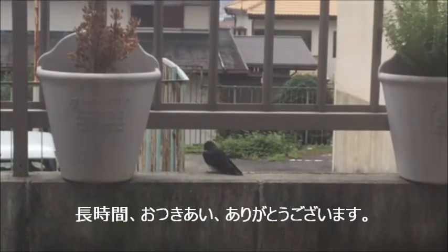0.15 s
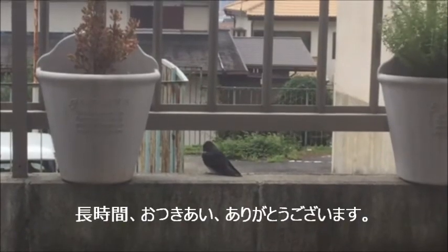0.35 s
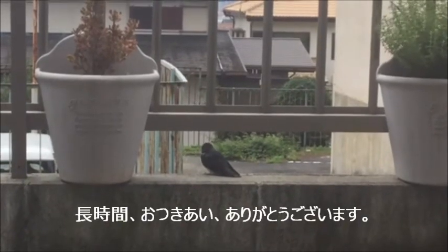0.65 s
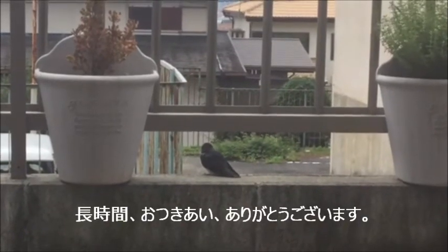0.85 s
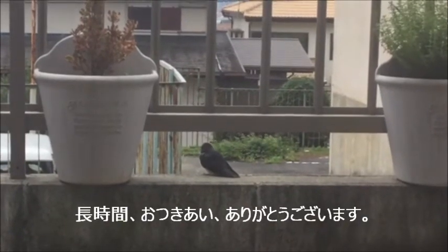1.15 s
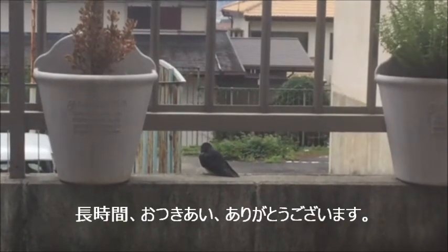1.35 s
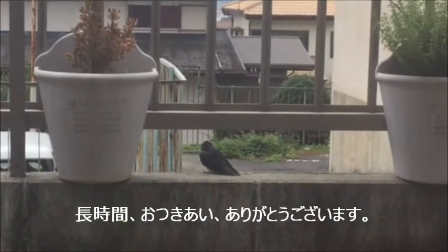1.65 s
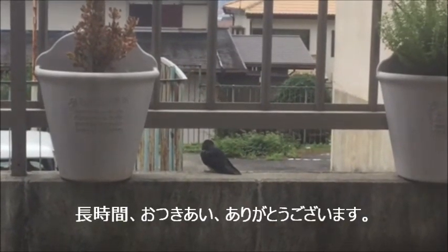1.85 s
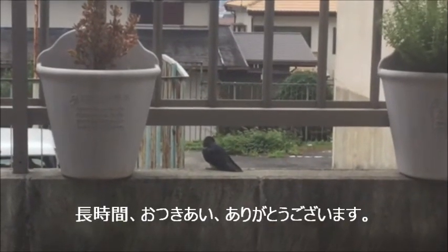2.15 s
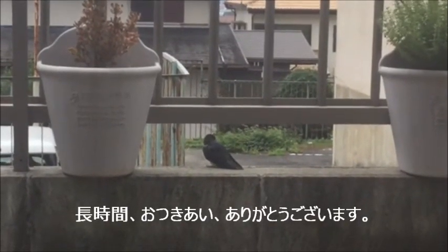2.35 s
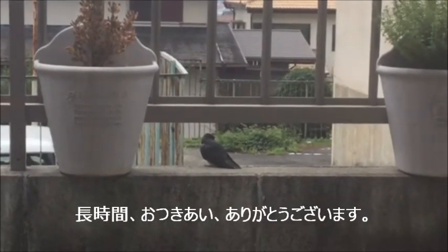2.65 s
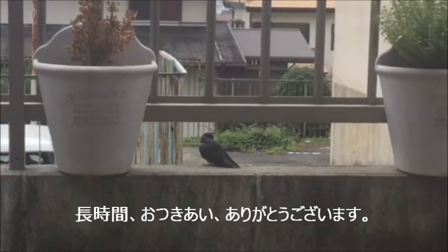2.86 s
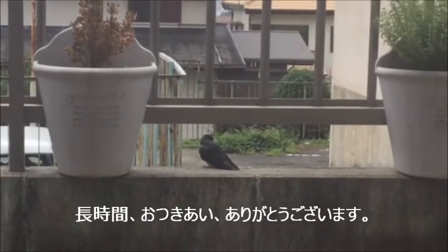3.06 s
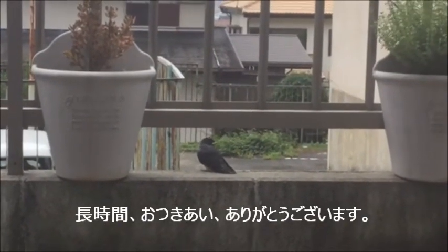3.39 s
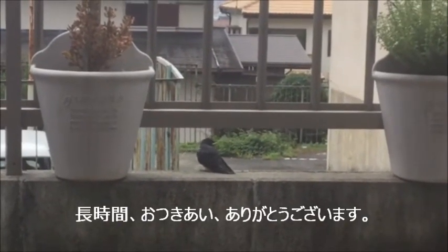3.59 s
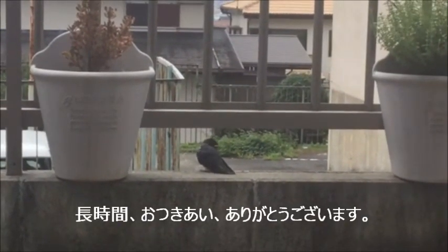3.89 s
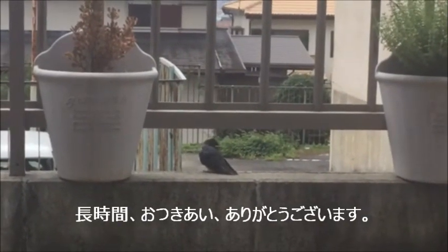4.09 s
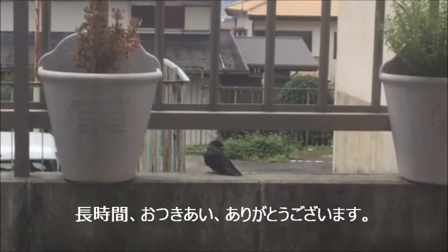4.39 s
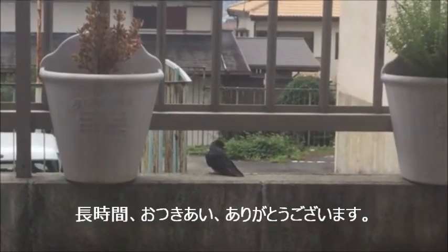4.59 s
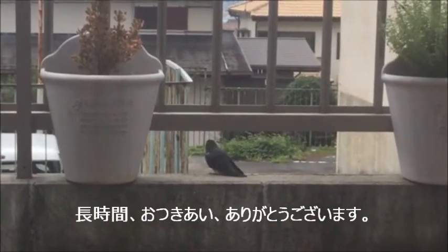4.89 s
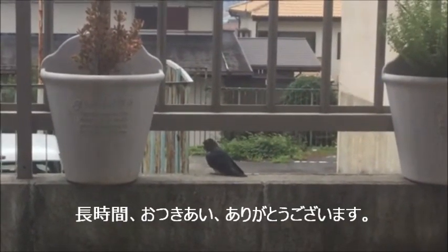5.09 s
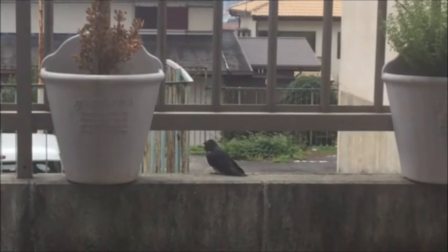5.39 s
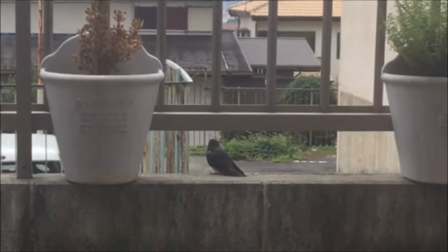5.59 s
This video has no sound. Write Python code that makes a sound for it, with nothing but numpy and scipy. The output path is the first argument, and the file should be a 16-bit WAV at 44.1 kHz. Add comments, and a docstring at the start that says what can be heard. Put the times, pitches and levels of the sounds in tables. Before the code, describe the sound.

Short, high, raspy chirps from a nearby young bird come at uneven gaps outdoors, over faint traffic rumble and an early low thump.

```python
"""Low town rumble and a wash of air come first, with a faint whine, a small bird's peep and soft bumps
on the camera. Then a swallow chick on a balcony ledge gives six sharp, raspy chirps, sung with both
sides of its syrinx at once; the balcony and the houses opposite answer. Between the chirps come
more peeps, a thin tick close by, a far crow's caws and two clacks from across the street."""
import sys
import numpy as np
from scipy import signal
from scipy.fft import rfft, irfft, next_fast_len
from scipy.io import wavfile
from scipy.ndimage import uniform_filter1d, map_coordinates

SR = 44100
rng = np.random.default_rng(int(sys.argv[2]) if len(sys.argv) > 2 else 0)


def store_pcm(level_fs):
    """Save levels as 16-bit WAV."""
    pcm = np.round(np.clip(level_fs, -1, 1) * 32767).astype(np.int16)
    wavfile.write(sys.argv[1], SR, np.atleast_2d(pcm).T)


N = 253134


def amp(db):
    """Decibels to gain."""
    return 10 ** (np.asarray(db) / 20)


def unit(x):
    """Scale to rms 1."""
    return x / np.sqrt(np.mean(x ** 2) + 1e-20)


def ramp(u):
    """A smooth fade-in as u goes from 0 to 1."""
    return np.sin(np.pi / 2 * np.clip(u, 0, 1)) ** 2


def wobble(rate, size):
    """A smooth random modulator, rate knots a second."""
    knots = rng.standard_normal(int(size * rate / SR) + 4)
    return map_coordinates(knots, [np.arange(size) * rate / SR])


def coloured(x, points):
    """Shape x with an EQ curve of (f/Hz, gain/dB) points, then scale to rms 1."""
    size = next_fast_len(len(x) + 8192)
    hz, db = np.transpose(points)
    gain = amp(np.interp(np.log(np.fft.rfftfreq(size, 1 / SR) + 1), np.log(hz), db))
    return unit(irfft(rfft(x, size) * gain, size)[:len(x)])


def noise(points, size):
    """Coloured noise of rms 1."""
    return coloured(rng.standard_normal(size), points)


def burst(colour, t, t60):
    """Coloured noise that dies by 60 dB in t60 seconds."""
    return noise(colour, len(t)) * amp(-60 * t / t60)


def phase_of(hz):
    """Running phase of a moving pitch."""
    return 2 * np.pi * np.cumsum(hz) / SR


def harmonics(phase, levels, first):
    """A stack of harmonics at the given dB levels, from number first upward."""
    return sum(amp(db) * np.sin(k * phase) for k, db in enumerate(levels, first))


def add(out, start, x):
    """Mix x into out from start seconds."""
    i = max(round(start * SR), 0)
    out[i:i + len(x)] += x[:len(out) - i]


def patchy(x, depth_db):
    """Let each band of x swell and sink on its own."""
    bands = signal.stft(x, nperseg=2048)[2]
    swells = uniform_filter1d(rng.standard_normal(bands.shape), size=3, axis=0)
    swells = uniform_filter1d(swells, size=3, axis=1)
    return unit(signal.istft(bands * amp(depth_db * unit(swells)), nperseg=2048)[1][:len(x)])


# Fader ride of the traffic, before its lift: (t/s, level/dB)
TRAFFIC_RIDE = [(0.0, -61), (0.78, -63.5), (0.94, -60.5), (2.14, -63.5), (2.43, -59), (5.74, -60.5)]
# Colours of the rumble and of the air: (f/Hz, relative level/dB)
RUMBLE_EQ = [(13, -57), (22, -31), (51, -2.5), (102, 2), (140, -2.5), (183, 1), (228, -7.5), (284, -8),
             (360, -11.5), (413, -18), (474, -26.5), (600, -27), (780, -50), (1320, -120)]
AIR_EQ = [(240, -25.5), (400, -5), (684, -3), (761, -3), (873, -6.5), (1150, -4.5), (1320, -9), (1450, -9),
          (1770, -10.5), (2750, -17), (3310, -15), (6500, -22), (8800, -23.5), (11000, -25), (15500, -27.5)]


def town(lift_db=3, air_db=-69.5):
    """The bed: lumpy traffic rumble and a smooth wash of air."""
    traffic_db = np.interp(np.arange(N) / SR, *np.transpose(TRAFFIC_RIDE)) + lift_db
    rumble = amp(traffic_db + 1.52 * wobble(30, N)) * patchy(noise(RUMBLE_EQ, N), depth_db=3.5)
    wash = amp(air_db + 0.96 * wobble(1.98, N)) * noise(AIR_EQ, N)
    return rumble + wash


# Swells of the whine: (t/s, level/dB, length/s, starting f/Hz)
WHINE_SWELLS = [(.05, -71.5, 0.51, 782), (.55, -71.5, 0.7, 785), (2.72, -74.5, 0.71, 788)]


def whine(sag_hz_per_s=25.9):
    """A faint far whine comes and goes, its pitch sinking a little through each swell."""
    out = np.zeros(N)
    for start, db, length, hz in WHINE_SWELLS:
        t = np.arange(int(length * SR)) / SR
        swell = np.sin(np.pi * t / length).clip(0) ** .5 * amp(db + 2.8 * wobble(10, len(t)))
        pitch = hz - sag_hz_per_s * t + 16 * wobble(50.7, len(t))
        add(out, start, swell * np.sin(phase_of(pitch)))
    return out


# Colour of the street's echoes: (f/Hz, relative level/dB)
STREET_EQ = [(1300, 1), (2500, -6), (4400, -4.5), (7000, -9), (15000, -5)]


def reverb(x, t60, wet_db, build_s=0.0052):
    """The dry sound plus a diffuse tail of echoes, duller than the source."""
    t = np.arange(SR * 3 // 4) / SR
    tail = burst(STREET_EQ, t, t60) * (1 - np.exp(-t / build_s))
    response = amp(wet_db) * tail / np.linalg.norm(tail)
    response[0] += 1  # the direct path
    return signal.fftconvolve(x, response)


# Peeps of other small birds: (t/s, level/dB, first f/Hz, last f/Hz, length/s)
BIRD_PEEPS = [(0.219, -69.5, 4310, 3750, 0.08), (1.257, -74, 5000, 5300, 0.017),
              (3.513, -65.5, 3810, 3700, 0.023), (3.686, -68, 4400, 5140, 0.053),
              (4.237, -68, 5110, 4890, 0.035), (4.399, -71.5, 4110, 5330, 0.042),
              (5.448, -62.5, 4450, 5130, 0.025)]


def peeps():
    """Small birds give thin, gliding peeps, wet with street echo."""
    out = np.zeros(N)
    for start, db, first_hz, last_hz, length in BIRD_PEEPS:
        u = np.linspace(0, 1, int(length * SR))
        hz = (first_hz + (last_hz - first_hz) * u) * (1 + .05 * wobble(540, len(u)))
        peep = np.sin(np.pi * u) * np.sin(phase_of(hz))
        add(out, start, amp(db) * reverb(peep, t60=0.93, wet_db=-1.0))
    return out


# Bumps on the camera: (t/s, level/dB, first f/Hz, last f/Hz, swell time/s)
CAMERA_BUMPS = [(0.2432, -31, 115, 76.4, 0.014), (0.2764, -27.5, 240, 85.5, 0.0065),
                (0.297, -22.5, 338, 44.4, 0.0082), (0.344, -39.5, 80, 60, 0.0076),
                (0.365, -36.5, 139, 85, 0.0056)]


def bumps(relax_s=.007):
    """Soft pushes on the camera: a few low swings that slow as the contact relaxes."""
    out, t = np.zeros(N), np.arange(SR // 6) / SR
    for start, db, first_hz, last_hz, swell_s in CAMERA_BUMPS:
        hz = last_hz + (first_hz - last_hz) * np.exp(-t / relax_s)
        push = (t / swell_s * np.exp(1 - t / swell_s)) ** 2
        add(out, start, -amp(db) * push * np.sin(phase_of(hz)))
    return out


def glides(t, length, upper_hz, lower_hz, upper_sag_hz=650, lower_sag_hz=231):
    """Pitch curves: both voices sag in mid-call; the lower scoops up, holds high, then breaks down."""
    u = t / length
    sag = np.exp(-((u - .52) / .33) ** 2)
    before_break_hz = 439.6 * (.5 - .5 * np.tanh((u - .38) / .052))
    scoop_hz = 297 * np.exp(-t / 0.00399)
    return upper_hz - upper_sag_hz * sag, lower_hz - lower_sag_hz * sag + before_break_hz - scoop_hz


def efforts(t, length, lower_db, attack_s, fade_db, closed_db=-26, growth_db=18.5):
    """Envelopes: the upper voice opens and fades, the lower leads and then grows; they stop together."""
    gate = ramp(t / 0.0029) * ramp((length - t) / .014)
    late_entry = ramp(t / 0.0056) ** 2
    accent_db = 7 * (1 - ramp(t / 0.006 - .5))
    upper = amp(closed_db * (1 - ramp(t / attack_s)) - fade_db * t / length)
    lower = amp(lower_db - growth_db * (1 - t / length) + accent_db)
    return gate * late_entry * upper, gate * lower


# Overtones of the lower voice (2nd to 5th) and of the upper (2nd, 3rd): (relative level/dB)
LOWER_HARMONICS = [-8.5, -33, -32, -25]
UPPER_HARMONICS = [-17, -23]
# The closing squeak, the sum tone of both voices and its octave: (relative level/dB)
SUM_TONES = [-3, -20]
# Colour of the hiss in the rasp: (f/Hz, relative level/dB)
RASP_EQ = [(1200, -17.5), (2000, -15.5), (2500, -2), (3600, 0.5), (5200, -3), (6200, -4.5), (7400, -8.5),
           (8200, -17), (9200, -15), (10400, -24), (12000, -16.5), (13700, -16), (15700, -29)]


def chirp(length, upper_pitch, lower_pitch, lower_db, attack_s, fade_db,
          flutter_hz=490, squeak_growth_db=8, hiss_db=-15):
    """Two membranes glide separately; their flutter roughens both, and they mix into sum tones."""
    t = np.arange(int(length * SR)) / SR
    upper_hz, lower_hz = glides(t, length, upper_pitch, lower_pitch)
    upper, lower = efforts(t, length, lower_db, attack_s, fade_db)
    rasp = .54 + .23 * np.exp(-((t / length - .63) / .26) ** 2)  # grittiest late in the call
    # each membrane wavers about its glide without drifting off it
    upper_phase = phase_of(upper_hz) + .35 * rasp * wobble(700, len(t))
    lower_phase = phase_of(lower_hz) + .3 * rasp * wobble(700, len(t))
    # the flutter puts sidebands between the two voices
    flutter = phase_of(flutter_hz * (1 + 0.182 * wobble(297, len(t))))
    upper_side = 0.31 * rasp * np.sin(upper_phase - flutter)
    lower_side = 0.71 * rasp * np.sin(lower_phase + flutter) * (.7 + .7 * np.cos(flutter))
    voices = upper * (np.sin(upper_phase) + upper_side) + lower * (np.sin(lower_phase) + lower_side)
    # more rasp brightens the upper voice
    overtones = lower * harmonics(lower_phase, LOWER_HARMONICS, first=2)
    overtones += rasp ** 3.04 * upper * harmonics(upper_phase, UPPER_HARMONICS, first=2)
    # the sum tones need both voices, so they follow the weaker one
    squeak_gain = amp(squeak_growth_db * (t / length - 1)) * np.minimum(upper, lower)
    squeak = squeak_gain * harmonics(upper_phase + lower_phase, SUM_TONES, first=1)
    hiss = amp(hiss_db) * rasp * np.sqrt(upper + lower) * noise(RASP_EQ, len(t))
    return voices + overtones + squeak + hiss


# Early reflections on the balcony: (delay/s, level/dB)
BALCONY_ECHOES = [(.0023, -3), (.0058, -6), (0.0126, -7.5), (0.022, -15), (.027, -12.5)]


def balcony(x):
    """Ledge, pots and wall throw back a few quick copies."""
    out = np.pad(x, (0, SR // 20))
    for delay, db in BALCONY_ECHOES:
        add(out, delay * (1 + .03 * rng.standard_normal()), amp(db) * x)
    return out


# The chick's chirps: (t/s, level/dB, length/s, upper base f/Hz, lower base f/Hz,
# lower voice's closing relative level/dB, upper voice's attack/s, its fade over the call/dB)
CHICK_CHIRPS = [(0.468, -40.5, 0.089, 5060, 2793, -16, 0.026, 16),
                (1.94, -43, 0.082, 4890, 2748, -13, 0.019, 12.5),
                (3.335, -41.5, 0.088, 4890, 2713, -15, 0.023, 13.5),
                (3.942, -42.5, .095, 4960, 2690, -14, 0.031, 14.5),
                (4.648, -42, .087, 4830, 2665, -12.5, 0.021, 11.5),
                (5.295, -42, 0.084, 4868, 2629, -5, 0.017, 4.5)]


def chick():
    """The swallow chick, up front: each chirp rings round the balcony and then down the street."""
    out = np.zeros(N)
    for start, db, *shape in CHICK_CHIRPS:
        near = reverb(balcony(chirp(*shape)), t60=0.22, wet_db=-12)
        call = reverb(near, t60=0.78, wet_db=-21.5)
        add(out, start, amp(db) * call / np.std(call[:SR // 12]))
    return out


# The close tick: (t/s, level/dB, t60/s)
NEAR_TICKS = [(0.767, -59, 0.024)]


def tick():
    """A thin tick close by, dry and bright."""
    out, t = np.zeros(N), np.arange(SR // 4) / SR
    bright_eq = [(1000, 3), (4000, 3), (14000, 15)]
    for start, db, t60 in NEAR_TICKS:
        add(out, start, amp(db) * burst(bright_eq, t, t60))
    return out


# The crow's caws: (t/s, level/dB, length/s)
CROW_CAWS = [(2.081, -75, 0.25), (2.741, -73.5, .24), (3.398, -76, 0.29), (4.041, -76, 0.24),
             (4.714, -75, 0.27)]
# Resonance of its throat: (f/Hz, relative level/dB)
THROAT_EQ = [(600, -35), (950, -8.5), (1150, 1.5), (1340, -7), (1480, -11), (2000, -28)]


def crow():
    """Hoarse caws: a jittery, arching pitch shaped by the throat and blurred by distance."""
    out = np.zeros(N)
    for start, db, length in CROW_CAWS:
        arch = np.sin(np.linspace(0, np.pi, int(length * SR))).clip(0) ** .5
        hz = (410 + 40 * arch) * (1 + 0.046 * wobble(197.2, len(arch)))
        caw = coloured(harmonics(phase_of(hz), [0, 0, 0], first=2), THROAT_EQ)
        add(out, start, amp(db) * reverb(arch * caw, t60=1.0, wet_db=-4))
    return out


# Clacks across the street: (t/s, level/dB, t60/s, share of hollow ring/0-1)
STREET_CLACKS = [(2.475, -50.5, 0.086, 0.3), (3.045, -63, 0.13, 0.7)]
# Colours of their impact and of their hollow ring: (f/Hz, relative level/dB)
IMPACT_EQ = [(300, -36), (700, -14), (1050, -4), (2300, -9), (3500, -4.5), (4400, -4.5), (5500, -7),
             (8000, -18), (15000, -27)]
HOLLOW_EQ = [(2700, -21), (3450, -11), (4400, -14), (6000, -40)]


def clacks(attack_s=0.0013):
    """Far clacks ring hollow and arrive with much street echo."""
    out, t = np.zeros(N), np.arange(SR // 4) / SR
    for start, db, t60, ring_share in STREET_CLACKS:
        impact = np.sqrt(1 - ring_share) * burst(IMPACT_EQ, t, t60)
        ring = np.sqrt(ring_share) * burst(HOLLOW_EQ, t, t60)
        clack = (impact + ring) * (1 - np.exp(-t / attack_s))
        add(out, start, amp(db) * reverb(clack, t60=0.7, wet_db=0))
    return out


def scene():
    """The mono mix: all sources at one microphone."""
    return (town() + whine() + peeps() + bumps() + chick() + tick() + crow() + clacks())[None]


def record(dry, low_cut_hz=32, top_hz=15720):
    """The camera's microphone drops the deepest bass and keeps nothing above its band limit."""
    size = next_fast_len(N + 8192)
    hz = np.fft.rfftfreq(size, 1 / SR)
    low_cut = hz ** 4 / np.hypot(hz ** 4, low_cut_hz ** 4)
    return irfft(rfft(dry, size) * low_cut * (hz < top_hz), size)[:, :N]


dry = scene()
out = record(dry)
store_pcm(out)
```